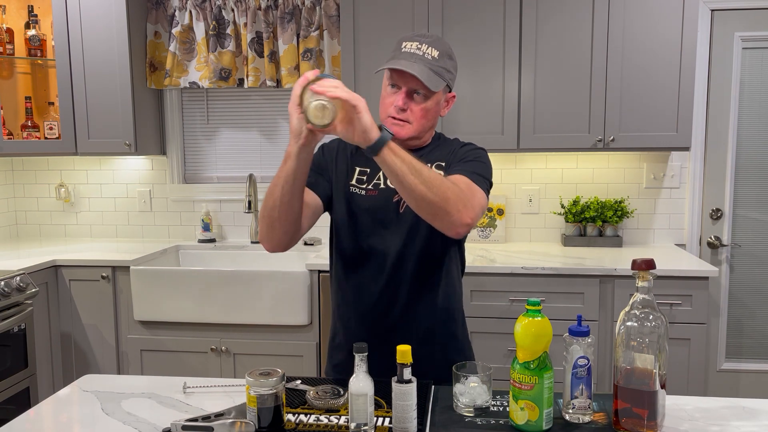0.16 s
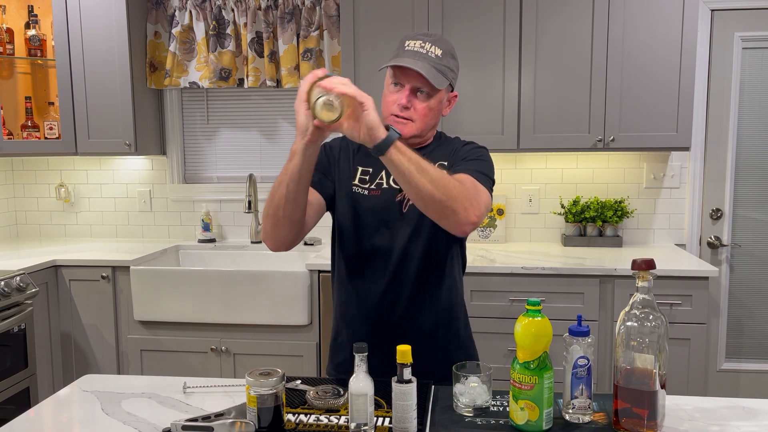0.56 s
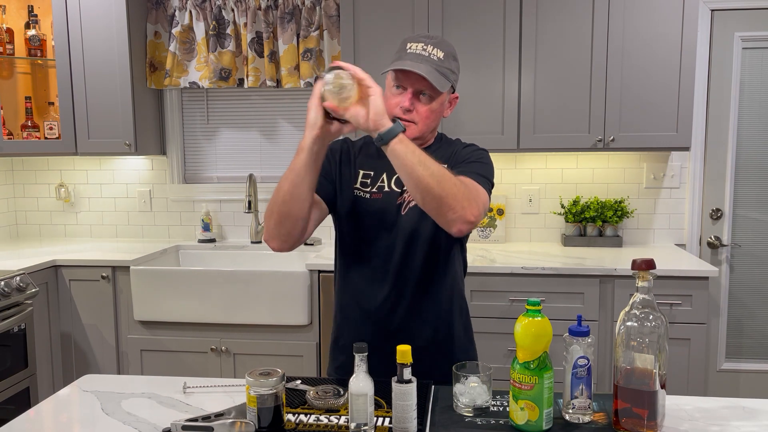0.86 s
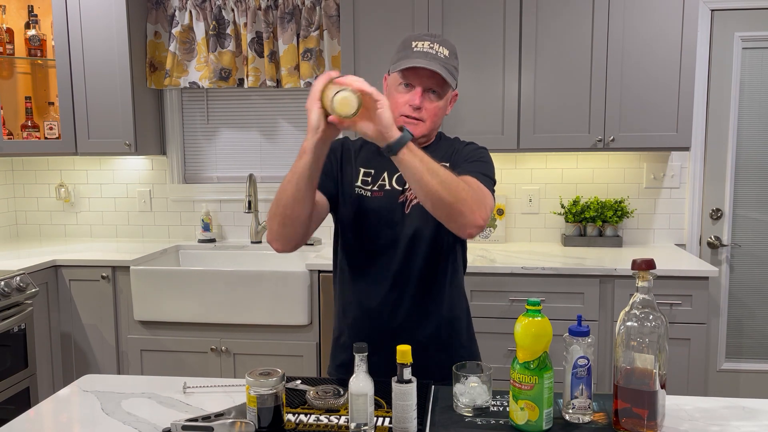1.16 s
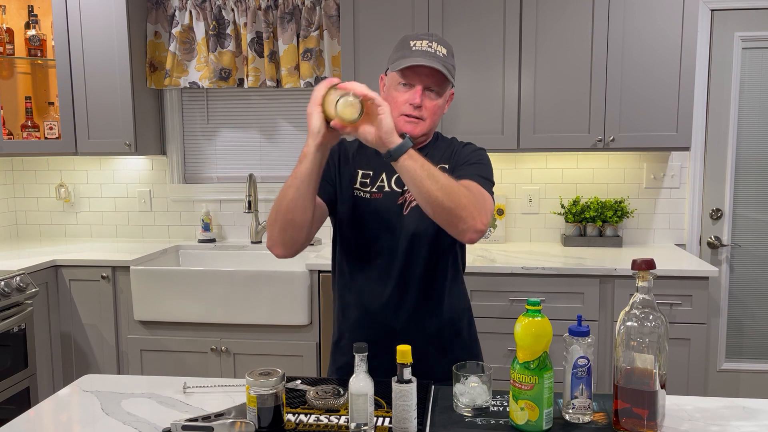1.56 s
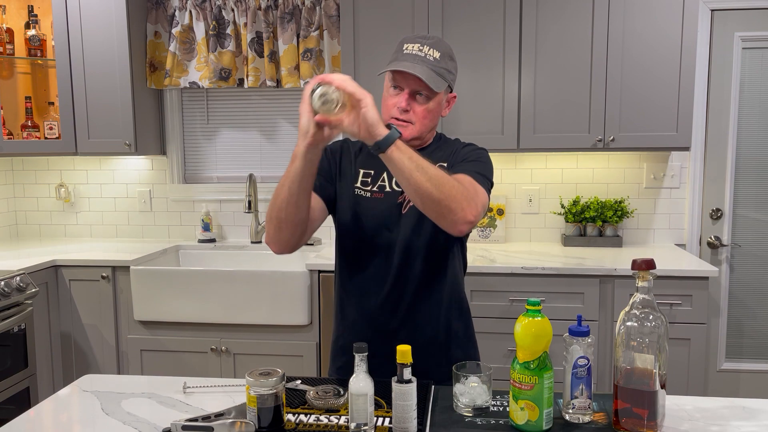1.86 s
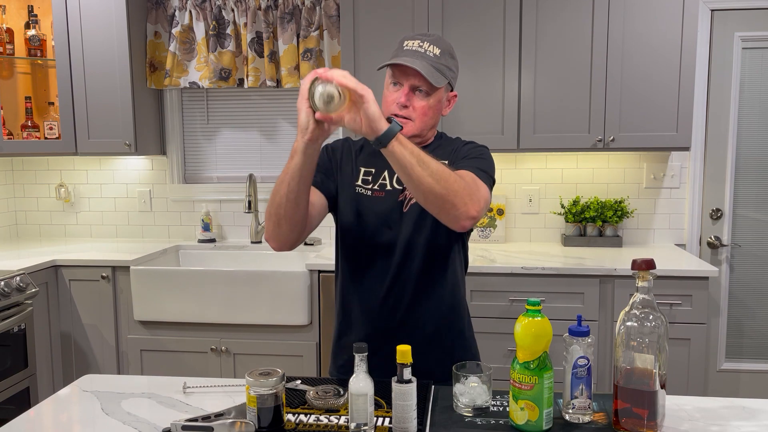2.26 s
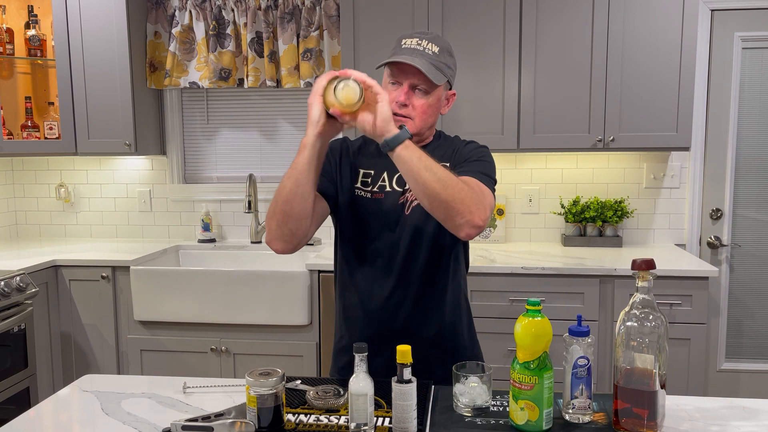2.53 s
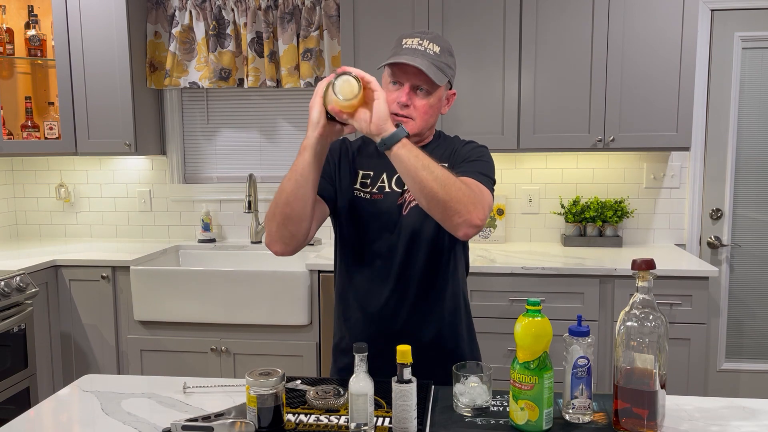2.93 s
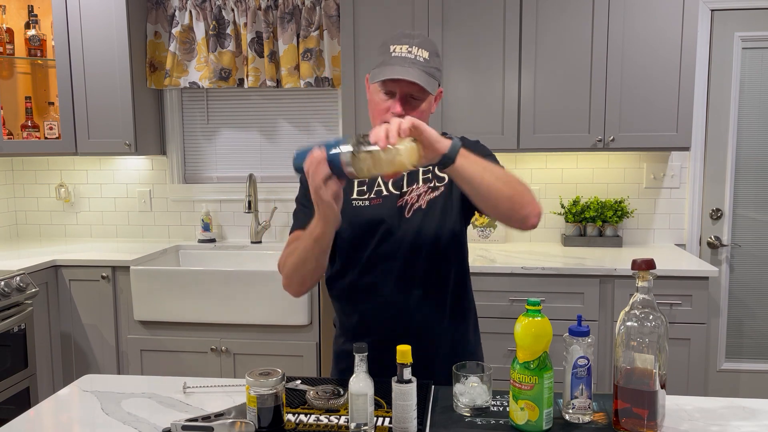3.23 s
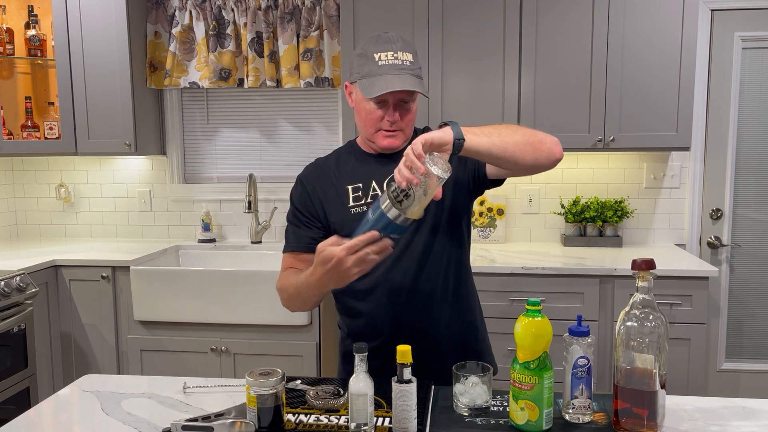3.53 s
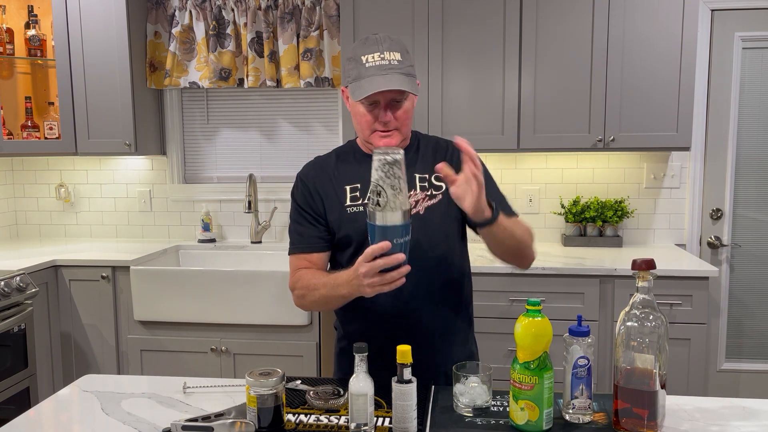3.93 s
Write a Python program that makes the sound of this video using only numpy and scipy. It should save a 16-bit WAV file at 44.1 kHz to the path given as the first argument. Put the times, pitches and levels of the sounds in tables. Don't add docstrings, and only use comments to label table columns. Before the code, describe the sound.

In a reflective home kitchen, ice cubes clatter rapidly against metal and each other, with a dull hollow knock on every stroke and wet sloshing beneath. The shaking runs steadily, then breaks off into a short cluster of clinks and sparse, weakening ticks. A low fridge hum and faint room hiss remain, heard through a phone microphone across the counter.

```python
import sys
import numpy as np
from scipy import signal
from scipy.fft import rfft, irfft, next_fast_len
from scipy.io import wavfile
from scipy.ndimage import map_coordinates

SR = 44100
rng = np.random.default_rng(int(sys.argv[2]) if len(sys.argv) > 2 else 0)


def voltage_ratio(level):
    return 10 ** (np.asarray(level, float) / 20)


def store_wav(level_fs):
    pcm = np.round(np.clip(np.atleast_2d(level_fs), -1, 1) * 32767)
    wavfile.write(sys.argv[1], SR, pcm.T.astype(np.int16))


N = 180184

# (time [s], level [dB])
SMALL_ICE_LEVEL = [(0.0, -37.5), (0.47, -39), (0.75, -40), (1.15, -40), (1.58, -40), (2.09, -38.5),
                   (2.26, -43.5), (2.64, -40.5), (2.99, -42), (3.12, -47.5), (3.23, -56.5), (3.39, -58.5),
                   (3.59, -59.5), (3.83, -63), (4.09, -98)]
# (pitch [Hz], level [dB], time to fade by 60 dB [s])
STEEL_MODES = [(2972, 2.5, 0.014), (3450, -0.5, 0.022), (3880, -7.5, 0.011), (4430, -4.5, 0.013),
               (5040, 2.5, 0.0098), (5620, -7, 0.0085), (6450, -17, 0.0036), (8500, -9, 0.0062)]
# (pitch [Hz], level [dB], time to fade by 60 dB [s])
ICE_MODES = [(3070, -4, 0.025), (3734, -6, 0.029), (4350, -1.5, 0.0077), (5085, -3, 0.024),
             (5330, 2, 0.0076), (5710, -5.5, 0.023), (6500, -21, 0.0042), (8240, -5.5, 0.0046)]


def unit(x):
    return x / np.sqrt(np.mean(x ** 2) + 1e-20)


def peak(x):
    return x / np.abs(x).max()


def band(x, low_hz, high_hz):
    sos = signal.butter(N=3, Wn=[low_hz, high_hz], btype="band", fs=SR, output="sos")
    return signal.sosfilt(sos, x)


def along(points, hz):
    f, v = np.transpose(points)
    below = -120 if v[0] < 0 else v[0]
    return np.interp(np.log(hz + 1), np.log(f + 1), v, below)


def coloured(x, spectrum):
    m = next_fast_len(N + 8192)
    gain = voltage_ratio(along(spectrum, np.fft.rfftfreq(m, 1 / SR)))
    return unit(irfft(rfft(x, m) * gain, m)[:N])


def wobble(rate):
    knots = rng.standard_normal(int(N * rate / SR) + 4)
    return map_coordinates(knots, [np.arange(N) * rate / SR])


def ring(modes, t, scatter_db, detune):
    hz, db, t60 = np.transpose(modes)[..., None]
    luck = rng.standard_normal((3, len(modes), 1))
    phase = 2 * np.pi * hz * (1 + detune * luck[1]) * t + luck[2]
    fade = voltage_ratio(db + scatter_db * luck[0] - 60 * t / t60)
    return peak(np.sum(fade * np.sin(phase), 0))


def air():
    # (pitch [Hz], level [dB per Hz])
    fridge = [(30, -22), (40, -11), (53, 4.5), (64, -16), (90, -14), (200, -16), (440, -16.5), (700, -26.5),
              (2000, -25), (6000, -62), (15500, -58)]
    # (pitch [Hz], level [dB per Hz])
    arms = [(2, -28), (4.5, 3.5), (6.5, 1.5), (9, -27), (21, -13), (28, -44), (40, -106)]
    hum = voltage_ratio(-62.5) * coloured(rng.standard_normal(N), fridge)
    return hum + voltage_ratio(-44.5) * coloured(rng.standard_normal(N), arms)


def chips():
    # (pitch [Hz], level [dB per Hz])
    grit = [(900, -81), (1700, -7), (2400, -12.5), (2950, -1.5), (4000, -8.5), (5100, -4.5), (7000, -13.5),
            (10000, -24), (15600, -34.5)]
    # (pitch [Hz], level [dB per Hz])
    liquid = [(300, -23), (600, -11.5), (1200, -10.5), (1700, 3), (2300, -8.5), (4000, -27)]
    level_db = np.interp(np.arange(N) / SR, *np.transpose(SMALL_ICE_LEVEL))
    luck = rng.random((2, N))
    ticks = (luck[0] < 450 / SR) * voltage_ratio(1.6 * luck[1] ** 2)
    fade = voltage_ratio(-60 * np.arange(600) / SR / 0.01)
    contact = np.abs(signal.fftconvolve(ticks, fade)[:N])
    rattle = coloured(contact * rng.standard_normal(N) * voltage_ratio(2.26 * wobble(29.72)), grit)
    surge = voltage_ratio(7.1 * wobble(45) + 1.1 * wobble(9.44))
    slosh = coloured(rng.standard_normal(N) * surge, liquid)
    return voltage_ratio(level_db - 3.5) * rattle + voltage_ratio(level_db - 10.5) * slosh


def kitchen(x, count=5):
    # (pitch [Hz], level [dB])
    tiles = [(300, 1), (1500, -3), (4000, -1), (7000, -2.5), (12000, 0.5), (16000, -17)]
    # (pitch [Hz], time to fade by 60 dB [s])
    fade_times = [(300, 0.69), (1000, 0.38), (3000, 0.43), (8000, 0.26), (15000, 0.086)]
    hz, t, z = signal.stft(rng.standard_normal((count, SR * 2 // 3)), SR, nperseg=256)
    fade = along(tiles, hz)[:, None] - 60 * t / along(fade_times, hz)[:, None]
    tails = signal.istft(z * voltage_ratio(fade), SR, nperseg=256)[1]
    lead = SR // 3
    x = np.concatenate([x[SR // 4:][:lead], x])
    place = (np.arange(-lead, N) // 2000 % count) == np.arange(count)[:, None]
    wet = signal.fftconvolve(x * place, voltage_ratio(-32) * tails, axes=1).sum(0)
    return np.pad(wet, (160, 0))[lead:][:N]


def cubes(contacts, body, skid_db=-8, drag_db=-15, crack_db=-5):
    # (pitch [Hz], level [dB], time to fade by 60 dB [s])
    glass_modes = [(1714, -4.5, 0.011), (2038, -7, 0.0091)]
    skid_s = 0.005
    out, t = np.zeros(N + SR), np.arange(SR // 25) / SR - skid_s
    late = np.abs(t)
    skid = voltage_ratio(skid_db - 60 * late / 0.014)
    drag = voltage_ratio(-60 * late / 0.0011) + voltage_ratio(drag_db - 60 * late / 0.031)
    force = np.where(t < 0, skid, drag)
    for s, db, glass_db, snap_db in contacts:
        blow = rng.standard_normal(len(t)) * force
        blow[round(skid_s * SR)] = 1.57
        body_ring = ring(body, t + skid_s, scatter_db=3, detune=0.017)
        glass_ring = ring(glass_modes, t + skid_s, scatter_db=1, detune=0.042)
        click = peak(signal.fftconvolve(blow, body_ring)[:len(t)])
        glass = peak(signal.fftconvolve(blow, glass_ring)[:len(t)])
        crack = peak(band(blow, low_hz=2380, high_hz=6600))
        snap = peak(band(blow, low_hz=6240, high_hz=12400))
        hit = band(click + voltage_ratio(glass_db - 3.5) * glass, low_hz=900, high_hz=9240)
        hit = hit + voltage_ratio(crack_db) * crack + voltage_ratio(snap_db - 2.5) * snap
        out[round(s * SR):][:len(t)] += voltage_ratio(db + 1.5) * hit
    out = band(out, low_hz=1084, high_hz=14400)[round(skid_s * SR):]
    return out[:N] + voltage_ratio(-18) * np.pad(out, (56, 0))[:N]


def ordinary(contacts):
    luck = rng.standard_normal((len(contacts), 2))
    usual_db, spread_db = [-9, -21], [4.5, 6]
    return np.column_stack([contacts, usual_db + luck * spread_db])


def lesser(per_s):
    shake_ends_s = 3.19
    over_db, spread_db = 5, 4
    luck = rng.random((90, 2))
    s = (np.arange(len(luck)) + luck[:, 0]) / per_s
    db = np.interp(s, *np.transpose(SMALL_ICE_LEVEL)) + over_db + spread_db * (2 * luck[:, 1] - 1)
    return ordinary(np.column_stack([s, db]))[s < shake_ends_s]


def shaken_cubes():
    # (time
    # [s], peak [dB])
    further_touches = [(0.0133, -27), (0.1583, -41), (0.2557, -31), (0.332, -30), (0.4344, -29), (0.4708, -27.5),
                       (0.524, -37), (0.7043, -25), (0.8386, -32), (0.8949, -30), (1.143, -30), (1.197, -29),
                       (1.2704, -27), (1.4529, -36), (1.4793, -26.5), (1.5065, -30.5), (1.5254, -30.5),
                       (1.7098, -31), (1.7558, -31), (2.055, -27.5), (2.2327, -23.5), (2.2921, -27), (2.4, -29),
                       (2.561, -28), (2.7001, -26), (2.7423, -27.5), (2.8365, -28.5), (2.9056, -28), (2.9911, -35),
                       (3.0122, -29)]
    # (time [s], peak [dB], glass ring [dB], snap [dB])
    cube_on_cube = [(0.084, -30, -24, 4.5), (0.1812, -28, -9.5, -19), (0.2402, -24.5, -11, -2),
                    (0.2853, -25, -8, -6), (0.4873, -28.5, 3, -1.5), (0.5944, -30, 0, -15),
                    (0.7205, -25, -2, -23), (0.8083, -31, 3, -19), (0.8789, -24.5, -24, -21),
                    (1.0296, -26.5, -8, -13), (1.1018, -23, -19, -24), (1.2831, -23, -20, -5.5),
                    (1.3112, -23, -28, -21), (1.376, -34, -24, -13), (1.5978, -26.5, -9, -4),
                    (1.6566, -26.5, -15, -21), (1.8101, -27, -10, -26), (1.9795, -30, -1, -5),
                    (2.0375, -22, -26, -20), (2.0803, -28.5, -12, -8), (2.1983, -21, -17, -26),
                    (2.275, -22, 3, -15), (2.4181, -25, -28, -4.5), (2.5496, -27.5, -17, -3.5),
                    (2.6067, -23, -19, -4), (2.6537, -24.5, -4.5, -18), (2.7991, -29, -15, -0.5),
                    (2.9158, -26, -5, -9), (3.1137, -30, -6, -5.5), (3.1645, -29.5, -23, -4)]
    # (time [s], peak [dB], glass ring [dB], snap [dB])
    cube_on_steel = [(0.3436, -24.5, -27, -14), (0.364, -24.5, -13, -20), (0.6409, -23, -6.5, -26),
                     (0.6641, -24, -28, -24), (0.6819, -26, -14, 4), (0.6938, -23.5, -23, -16),
                     (0.7347, -24.5, -1.5, -17), (0.8582, -23, -9, -12), (0.9195, -19.5, -24, -10.5),
                     (1.0046, -27.5, -5, -20), (1.0424, -29, -21, -25), (1.0507, -18.5, -32, -22),
                     (1.0806, -22.5, -33, -21), (1.1113, -26.5, -10, -21), (1.1288, -27, -21, -14),
                     (1.2283, -25.5, -7, -8), (1.2541, -21.5, -3, -24), (1.6696, -33, -25, -15),
                     (1.7735, -30, -4, -22), (1.8418, -26, -26, -32), (1.8729, -26, -23, -15),
                     (2.1925, -31.5, -20, -1), (2.2429, -28, -33, -29), (2.268, -26, -28, -13),
                     (2.4115, -28, -23, -35), (2.46, -24, -23, -5.5), (2.4789, -20, -10, -27),
                     (2.6755, -20.5, -9.5, -18), (3.0243, -27.5, 4, -20), (3.0851, -25, -21, -16)]
    hard = cubes(cube_on_steel, STEEL_MODES) + cubes(cube_on_cube, ICE_MODES)
    weak = cubes(lesser(per_s=24), STEEL_MODES) + cubes(lesser(per_s=20), ICE_MODES)
    return hard + weak + cubes(ordinary(further_touches), ICE_MODES)


def slams():
    # (time [s], peak [dB], hollow pitch [Hz], thump [dB])
    landings = [(0.157, -32, 1046, -4), (0.235, -43, 1470, -9), (0.333, -27.5, 1207, -2.5),
                (0.386, -39, 1200, -3), (0.523, -23.5, 1188, -11), (0.72, -26, 1254, -4),
                (0.896, -43, 1000, 5.5), (0.919, -36, 754, 2), (1.108, -28.5, 1202, 0),
                (1.282, -33.5, 1110, -22), (1.298, -35.5, 980, -2), (1.327, -34, 1174, -4),
                (1.487, -37, 1210, -19), (1.499, -32.5, 1210, -10), (1.52, -30, 1180, -11.5),
                (1.698, -27.5, 855, -4.5), (1.887, -33, 1344, -6), (1.911, -35, 1225, -9),
                (2.084, -31.5, 1260, -6), (2.274, -34, 1226, -2), (2.467, -28.5, 1222, -6.5),
                (2.651, -33, 920, -1), (2.849, -35, 1080, -6.5), (2.989, -28.5, 1150, -13),
                (3.012, -32, 894, -6.5), (3.188, -40.5, 1204, -27), (3.357, -37.5, 1010, -24),
                (3.528, -49, 1120, -7), (3.563, -49, 1080, 0.5), (3.683, -51, 1450, 4)]
    # (pitch [Hz], level [dB], time to fade by 60 dB [s])
    end_modes = [(451, -8.5, 0.067), (716, -19.5, 0.087), (806, -12.5, 0.25), (902, -3.5, 0.17),
                 (1023, -7, 0.25), (1212, 3, 0.19), (1490, -13, 0.12)]
    out, t = np.zeros(N + SR), np.arange(SR // 6) / SR
    onset = 1 - np.exp(-t / 0.0003)
    for s, db, hz, thump_db in landings:
        shell = voltage_ratio(1.5 - 60 * t / 0.11) * ring(end_modes, t, scatter_db=3, detune=0.015)
        cavity = voltage_ratio(-3.0 - 60 * t / 0.07) * np.sin(2 * np.pi * hz * t)
        rebound = voltage_ratio(-5.5 - 60 * np.abs(t - 0.027) / 0.016)
        grind = rng.standard_normal(len(t)) * (voltage_ratio(-60 * t / 0.045) + rebound)
        grind[0] = 12
        crunch = voltage_ratio(6) * peak(band(grind, low_hz=1063, high_hz=2100))
        thump = voltage_ratio(thump_db + 2.5) * peak(band(grind, low_hz=636, high_hz=1080))
        out[round(s * SR):][:len(t)] += voltage_ratio(db - 3.5) * onset * (shell + cavity + crunch + thump)
    return band(out, low_hz=396, high_hz=4140)[:N]


def last_cubes():
    # (time [s], peak [dB], glass ring [dB], snap [dB])
    meetings = [(3.2034, -41, 7, -14), (3.218, -30.5, -21, -13), (3.2793, -49, -9, -19),
                (3.3415, -29.5, 0, -19), (3.3665, -24.5, -15, -20), (3.5703, -56, -13, -20),
                (3.661, -38, -2, -18), (3.6825, -37.5, 5, -18), (3.689, -36.5, -9, -22),
                (3.6955, -35, -19, -18), (3.73, -35.5, 0.5, -16), (3.8266, -53, 8.5, -15),
                (3.8437, -47.5, -3, -18)]
    # (time [s], peak [dB], glass ring [dB], snap [dB])
    slides = [(3.3031, -30, -2, -30), (3.3433, -28, -10, -16), (3.3485, -37, -19, -11),
              (3.3613, -29, 2.5, -24), (3.4256, -41, 3, -20), (3.4464, -40.5, 2, -24),
              (3.5295, -57, -6, -22), (3.5617, -43.5, -2, 1), (3.5966, -41.5, -4, -14),
              (3.6108, -39.5, 1, -13), (3.6261, -48, -4, -23), (3.7502, -43, -11, -21),
              (3.7819, -48, -1, -14), (3.954, -43.5, -6, -30), (3.9855, -50, -24, -26),
              (4.005, -49, -17, -8), (4.025, -40, 5.5, -16)]
    settle = cubes(meetings, ICE_MODES, skid_db=-15.5, drag_db=-20.5, crack_db=0)
    return settle + cubes(slides, STEEL_MODES, skid_db=-15.5, drag_db=-19, crack_db=-2)


def scene():
    shaker = chips() + shaken_cubes() + slams() + last_cubes()
    return (air() + kitchen(shaker) + shaker)[None]


def low_pass(x):
    return signal.sosfilt(signal.butter(12, 15750, fs=SR, output="sos"), x)


def record(dry):
    top = signal.butter(N=14, Wn=15700, fs=SR, output="sos")
    mix = signal.sosfiltfilt(top, dry)
    return low_pass(mix)


dry = scene()
out = record(dry)
store_wav(out)
```